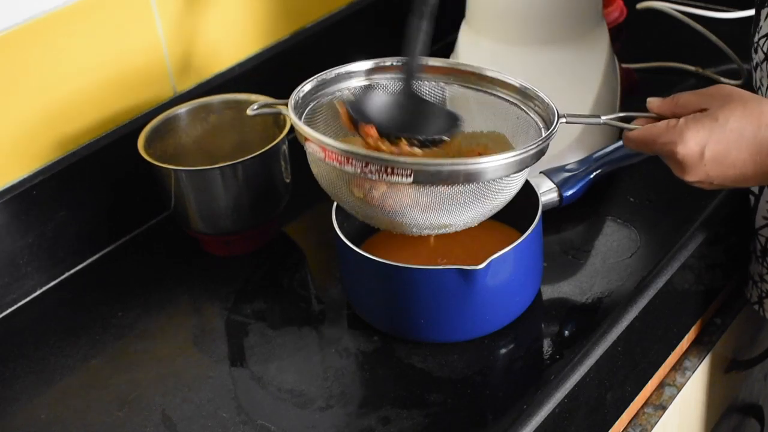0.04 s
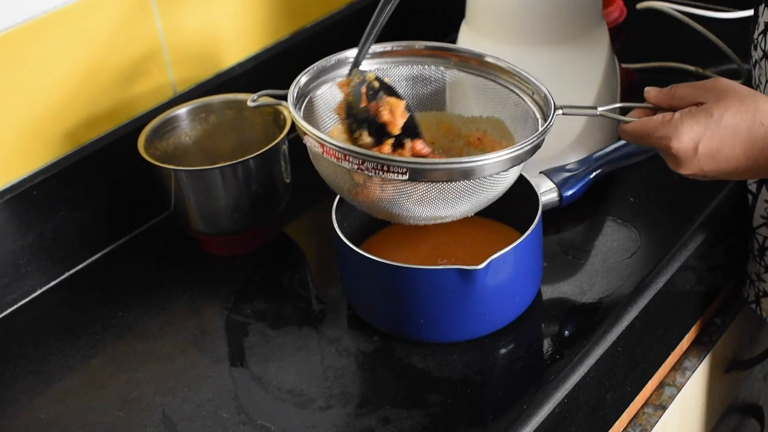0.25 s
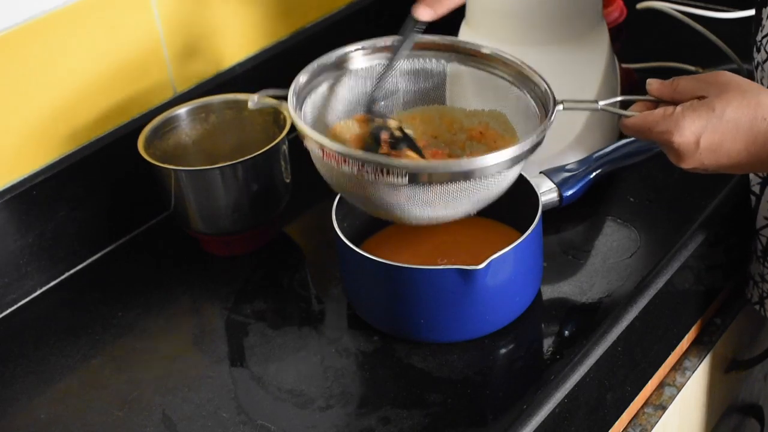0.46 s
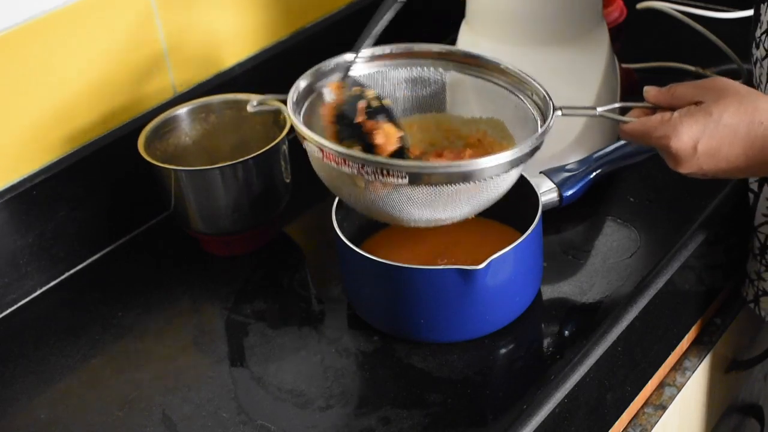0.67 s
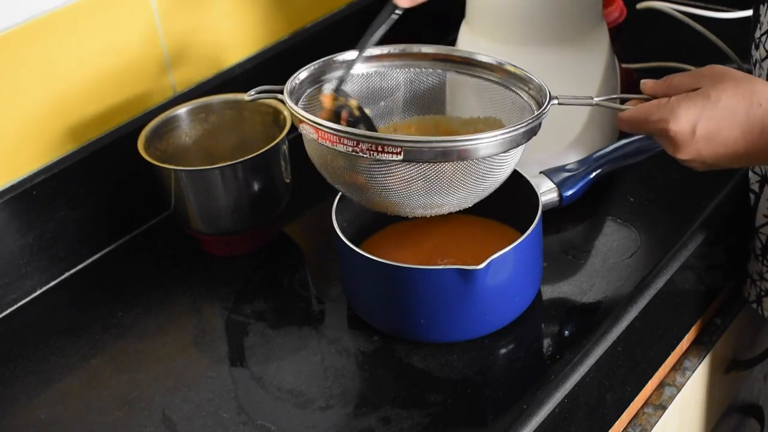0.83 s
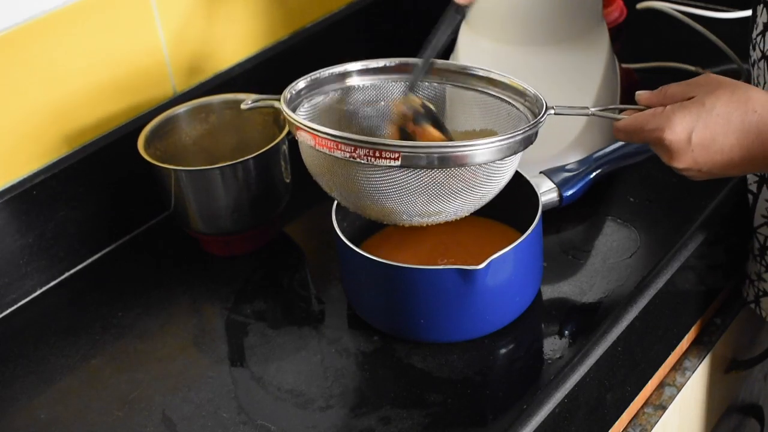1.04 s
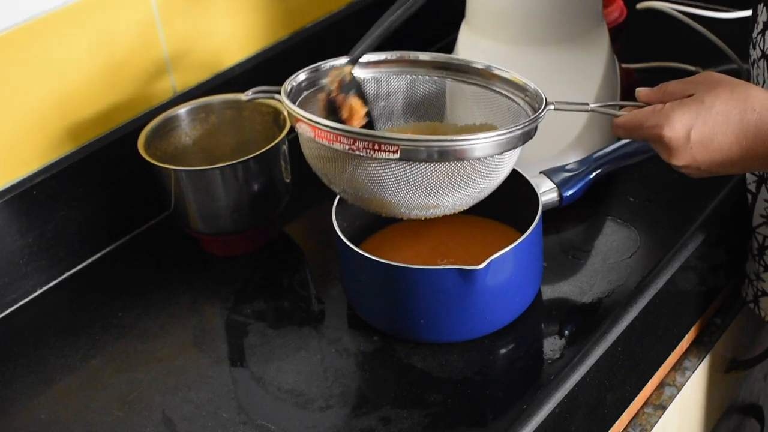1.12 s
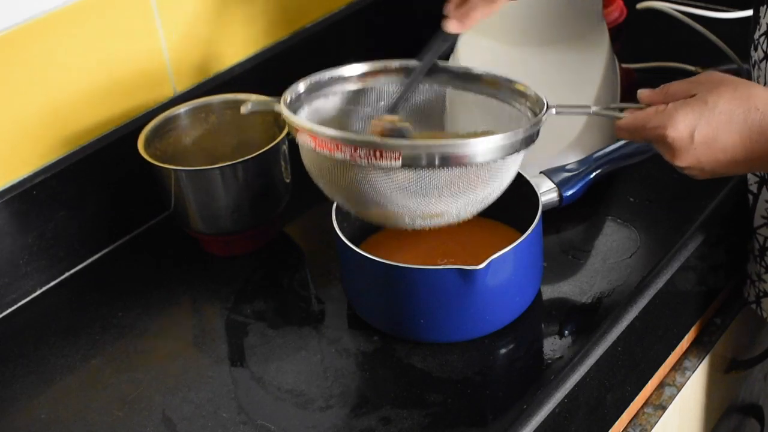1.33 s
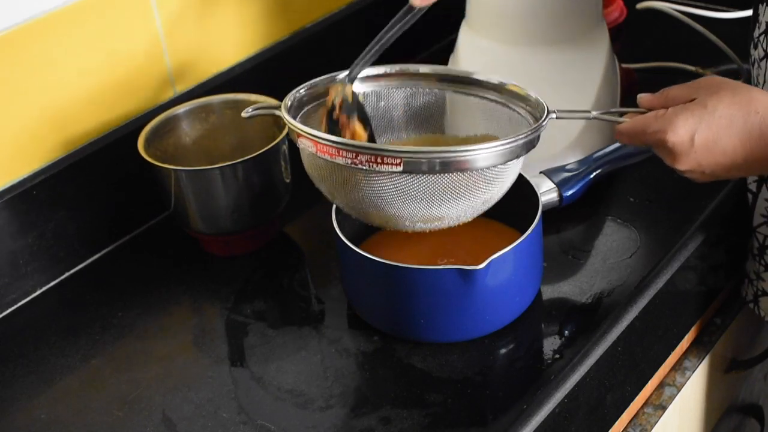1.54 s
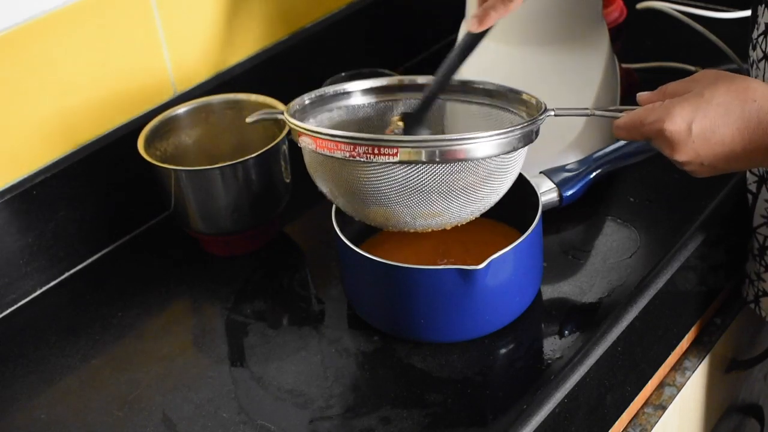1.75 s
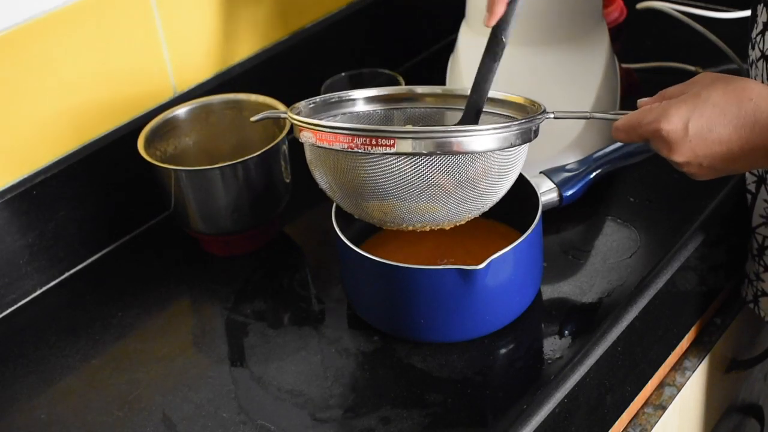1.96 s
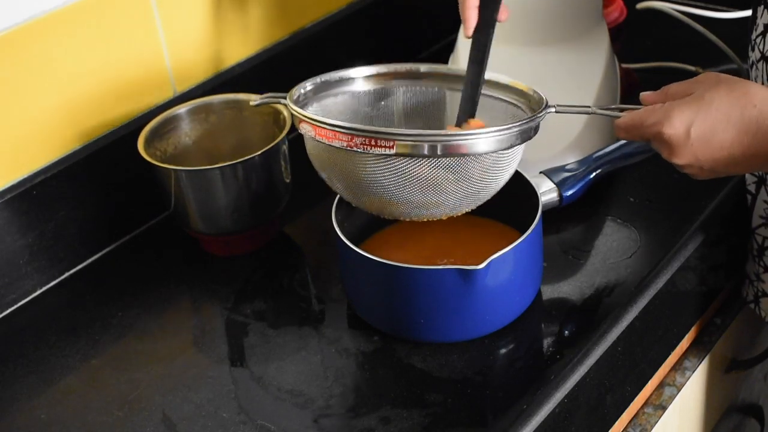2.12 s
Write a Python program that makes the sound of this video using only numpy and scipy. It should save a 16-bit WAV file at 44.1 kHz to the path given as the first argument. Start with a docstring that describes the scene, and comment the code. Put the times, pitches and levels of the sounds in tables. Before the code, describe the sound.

Short, raspy scrapes of a spatula against a metal strainer, with a few light taps.

```python
"""A small hard kitchen, where a plastic spatula pushes pulp through a steel mesh strainer in short strokes.
Its edge slips from wire to wire: this stick-slip force excites the modes of the bowl and rim, while
the flicked wires rasp and hiss. Now and then the spatula taps the steel, zips over a few wires or
plucks the mesh. Wet pulp ticks, and the strainer brushes a saucepan once, which rings faintly.
Behind it all lie room air, a soft midrange wash and the hum of an appliance."""
import sys
import numpy as np
from scipy import signal
from scipy.fft import rfft, irfft, next_fast_len
from scipy.io import wavfile
from scipy.ndimage import map_coordinates

SR = 44100
rng = np.random.default_rng(int(sys.argv[2]) if len(sys.argv) > 2 else 0)


def inscribe(sig):
    """Save sig as 16-bit PCM at rate SR to the path in sys.argv[1].

    A 1-D sig is mono; a 2-D sig holds one channel per row.
    Samples are clipped to [-1, 1] before scaling.
    """
    pcm = np.round(np.clip(np.atleast_2d(sig).T, -1, 1) * 32767)
    wavfile.write(sys.argv[1], SR, pcm.astype(np.int16))


N = 96402
TIME = np.arange(N) / SR


def amp(db):
    """Amplitude ratio of a level in decibels."""
    return 10 ** (np.asarray(db) / 20)

def unit(x):
    """Normalisation to an rms of 1."""
    return x / np.sqrt(np.mean(x ** 2) + 1e-20)

def along(points, hz):
    """Interpolation of (f/Hz, value) points on a logarithmic frequency axis."""
    f, v = np.transpose(points)
    return np.interp(np.log(hz + 1), np.log(f + 1), v)

def wobble(rate):
    """Random modulation: a spline through `rate` Gaussian values a second."""
    return map_coordinates(rng.standard_normal(N // 20), [np.arange(N) * rate / SR], mode="wrap")

def coloured(x, points, size=2048):
    """Minimum-phase filtering through (f/Hz, level/dB) points; white noise keeps its power."""
    cepstrum = irfft(np.log(amp(along(points, np.fft.rfftfreq(size, 1 / SR)))))
    cepstrum[1:size // 2] *= 2
    cepstrum[size // 2 + 1:] = 0
    response = irfft(np.exp(rfft(cepstrum)))
    return signal.fftconvolve(x, response / np.linalg.norm(response))[:N]

def push(start, length, attack, release):
    """Contact pressure: a linear rise, then exponential relaxation from `length` seconds after the start."""
    t = TIME - start
    return np.clip(t / attack, 0, 1) * np.exp(-np.maximum(t - length, 0) / release)

def damped_mode(start, db, hz, t60, waver=0):
    """Free vibration: a sinusoid swells briefly and decays exponentially; `waver` shifts its phase."""
    t = np.maximum(TIME - start, 0)
    swell = 1 - np.exp(-t * hz / 0.72)  # time constant of 0.72 cycles
    return 2 * amp(db - 60 * t / t60) * np.sin(2 * np.pi * hz * t + waver) * swell

def clicks(contacts, colour, t60):
    """Modal overlap: each contact excites resonances so dense that they decay as coloured noise."""
    rise_s = 0.0015  # the soft plastic cushions each contact
    envelope = sum(np.clip((TIME - s) / rise_s, 0, 1) * amp(db + 5 - 60 * np.maximum(TIME - s, 0) / t60)
                   for s, db in contacts)
    return coloured(envelope * rng.standard_normal(N), colour)


# Reverberation time of the kitchen: f/Hz, T60/s
ROOM_DECAY = [(200, 0.36), (1000, 0.35), (4000, 0.33), (9000, 0.21), (16000, 0.12)]

def kitchen(x, wet_db, wall_delay_s=0.004):
    """Reverberation: direct sound plus a diffuse tail whose treble is absorbed first."""
    hz, t, spectra = signal.stft(rng.standard_normal(SR // 2), SR, nperseg=256)
    decay = amp(-60 * t / along(ROOM_DECAY, hz)[:, None])
    tail = signal.istft(spectra * decay, SR, nperseg=256)[1]
    tail *= np.clip(np.arange(len(tail)) / SR / wall_delay_s - 1, 0, 1)
    diffuse = signal.fftconvolve(x, tail / np.linalg.norm(tail))[:N]
    return (x + amp(wet_db) * diffuse) / np.hypot(1, amp(wet_db))


# Spectrum of the room air: f/Hz, level/dB
AIR_SPECTRUM = [(25, -4), (60, -3.5), (100, -2), (150, -1), (280, 7.5), (600, 11), (2000, 2.5), (6000, -7),
                (15800, -6)]

def room_air():
    """Stationary broadband noise: the steady floor of the room."""
    return amp(-60) * coloured(rng.standard_normal(N), AIR_SPECTRUM)


# Partials of the appliance: f/Hz, level/dB
HUM_PARTIALS = [(100, -80.5), (203, -77), (269, -78.5), (399, -68.5)]

def appliance_hum():
    """Amplitude and phase modulation: each low partial wavers slightly."""
    return sum(np.sqrt(2) * amp(db + 1.5 * wobble(11.4))
               * np.sin(2 * np.pi * hz * TIME + 0.5 * wobble(5.78)) for hz, db in HUM_PARTIALS)


# Envelope of the wash: t/s, level/dB
WASH_ENVELOPE = [(0, -49), (.14, -53.5), (.3, -56), (.46, -54.5), (.78, -51), (.83, -55), (.96, -52),
                 (1.2, -52), (1.36, -56), (1.62, -55.5), (1.73, -50.5), (2.19, -51.5)]
# Its spectrum: f/Hz, level/dB
WASH_SPECTRUM = [(100, -44), (260, -3), (500, -4), (800, 3.5), (1050, 0.5), (1350, 5.5), (2000, 2.5),
                 (2800, -6), (5000, -10), (10000, -15), (15800, -27)]

def midrange_wash():
    """Amplitude-modulated noise: a soft wash that swells and sinks, heard between the strokes."""
    level_db = np.interp(TIME, *np.transpose(WASH_ENVELOPE)) + 0.13 * wobble(36.8)
    return amp(level_db) * coloured(rng.standard_normal(N), WASH_SPECTRUM)


# Modes of the saucepan: f/Hz, level/dB, T60/s
PAN_MODES = [(1404, -56, 0.55), (1920, -57, 0.24)]

def saucepan(touch_s=0.824):
    """Phase modulation: the brushing strainer rings the pan, and the rubbing unsettles that ring."""
    return sum(damped_mode(touch_s, db, hz, t60, waver=1.5 * wobble(91)) for hz, db, t60 in PAN_MODES)


# Ticks of the pulp: t/s, level/dB
PULP_TICKS = [(0.026, -49.5), (0.225, -59.5), (0.734, -62), (0.976, -62), (0.983, -54), (1.240, -63),
              (1.301, -58), (1.545, -48.5), (1.616, -62), (1.625, -64)]
# Spectrum shared by the ticks and the wire zips: f/Hz, level/dB
BRIGHT_SPECTRUM = [(100, -61), (500, 7), (2800, -6), (3900, 3.5), (6000, 0), (8500, 5.5), (10000, 5),
                   (13000, 4), (15800, -4.5)]

def pulp_ticks():
    """Broadband transients: the wet pulp gives faint, bright, quickly damped ticks."""
    return clicks(PULP_TICKS, BRIGHT_SPECTRUM, t60=0.064)


# Taps of the spatula on the steel: t/s, level/dB
SPATULA_TAPS = [(0.012, -51), (0.020, -59), (0.0355, -35.5), (0.051, -55), (0.761, -53), (0.823, -53),
                (1.0186, -41.5)]
# Spectrum of a tap: f/Hz, level/dB
TAP_SPECTRUM = [(50, -39), (150, -15), (250, -15), (600, -6.5), (1300, -8.5), (1900, -2.5), (2600, -7.5),
                (3550, -5.5), (4400, -6.5), (6500, -12), (12500, -10), (14000, -25)]
# Modes of the whole strainer: f/Hz, level/dB, T60/s
STRAINER_MODES = [(225, -63, .25), (266, -56, .3), (1850, -38, .03), (3550, -42, .018)]

def spatula_taps():
    """Impact excitation: every tap clicks, and the strongest sets the whole strainer ringing."""
    strongest_s = max(SPATULA_TAPS, key=lambda tap: tap[1])[0]
    ringing = sum(damped_mode(strongest_s, db, hz, t60) for hz, db, t60 in STRAINER_MODES)
    return clicks(SPATULA_TAPS, TAP_SPECTRUM, t60=0.047) + ringing


# Plucks of the mesh: t/s, level/dB, f/Hz, T60/s
MESH_PLUCKS = [(0.54, -40, 1606, 0.058), (0.634, -44.5, 862, 0.11), (0.758, -51, 4680, 0.039),
               (1.0202, -47.5, 4620, .04), (1.391, -48, 4030, .04), (1.53, -46.5, 6770, 0.024)]

def mesh_plucks():
    """Plucked vibration: a single mode rings freely as the edge catches or lets go."""
    return sum(damped_mode(*pluck) for pluck in MESH_PLUCKS)


def wire_flicks(per_s=8000, spread_db=7, chatter_db=1.26):
    """Shot noise: single wires give dense random impulses, in chattering clumps."""
    impulses = (rng.random(N) < per_s / SR) * np.sign(rng.standard_normal(N))
    level_db = spread_db * np.clip(rng.standard_normal(N), -2, 2) - chatter_db * wobble(400)
    return unit(impulses * amp(level_db))


# Runs of the edge over a few wires: t/s, duration/s, level/dB
WIRE_ZIPS = [(0.486, 0.0075, -45), (0.518, 0.004, -47), (0.620, 0.0032, -29), (1.393, 0.018, -33),
             (1.635, 0.0073, -44), (1.738, 0.11, -51.5), (1.828, 0.016, -42)]

def wire_zips():
    """Gated shot noise: the edge catches, then zips over the wires in a bright burst."""
    pressure = sum(amp(db) * push(s, length, attack=0.005, release=0.006) for s, length, db in WIRE_ZIPS)
    return coloured(pressure * wire_flicks(), BRIGHT_SPECTRUM)


def mesh_patches(flicks, low_hz=2548, high_hz=10680, t60=0.022, crossing_s=0.025, mix=0.36):
    """Local resonance: each patch of mesh that the edge crosses zings in its own short high modes."""
    t = np.arange(SR // 50) / SR
    hop = int(crossing_s * SR)
    zing = np.zeros(N + SR)
    for i in range(0, N, hop):
        place, phase = rng.random((2, 36, 1))  # 36 modes a patch
        hz = low_hz * (high_hz / low_hz) ** place
        response = np.sin(2 * np.pi * (hz * t + phase)).sum(0) * amp(-60 * t / t60)
        ringing = signal.fftconvolve(flicks[i:i + hop], response / np.linalg.norm(response))
        zing[i:i + len(ringing)] += ringing
    return np.sqrt(1 - mix) * flicks + np.sqrt(mix / 2) * zing[:N]

def stick_slip(start, length, rate, slowing_oct_per_s=5, scatter=0.22, spread_db=0.5):
    """Relaxation oscillation: an uneven train of force pulses, slowing as the push goes on."""
    gaps, sizes = rng.standard_normal((2, 400))
    from_middle = np.clip(TIME - start - length / 2, -length, length)
    slip_rate = rate * 2 ** (-slowing_oct_per_s * from_middle)
    wires_crossed = np.cumsum(slip_rate * (TIME >= start)) / SR
    slip_samples = np.searchsorted(wires_crossed, np.cumsum(np.exp(scatter * gaps)))
    return np.bincount(slip_samples, amp(spread_db * sizes), N)[:N]

def steel_response(force, modes, focus_hz, width_oct):
    """Modal superposition: the place of contact favours the modes near a focus frequency."""
    t = np.arange(SR // 8) / SR
    response = sum(rng.choice([-1, 1]) * amp(db - 60 * t / t60) * np.cos(2 * np.pi * hz * t)
                   / (1 + (np.log2(hz / focus_hz) / width_oct) ** 2) for hz, db, t60 in modes)
    radiation = signal.butter(2, [260, 3500], "bandpass", fs=SR, output="sos")  # open mesh: no bass
    return unit(signal.sosfilt(radiation, signal.oaconvolve(force, response)[:N]))


# Modes of the mesh bowl and of its rim: f/Hz, level/dB, T60/s
BOWL_MODES = [(285, 0, .07), (380, 0, .05), (470, -3, .045), (560, -7, .035), (640, -7, .04), (712, 2, .11),
              (810, -7, .035), (860, -1, .075), (915, -5, .04), (1002, -.5, .09), (1066, -2, .06),
              (1170, -1, .055)]
RIM_MODES = [(1310, -3, .025), (1423, -3, .045), (1470, -2, .04), (1595, -1, .05), (1689, 0, .06),
             (1750, -3, .04), (1812, 0, .055), (1910, -1, .045), (1985, -1, .045), (2110, -4, .03),
             (2218, -1, .045), (2352, -2, .045)]
# Spectra of the wires' rasp and hiss: f/Hz, level/dB
RASP_SPECTRUM = [(60, -96), (150, -79), (350, -11), (1200, 5), (2300, 0), (2850, 3.5), (3300, 2),
                 (4300, 1.5), (5400, 0), (7000, -7), (10000, -13), (16000, -24)]
HISS_SPECTRUM = [(2000, -49), (5500, -10), (7200, 0), (9500, 0.5), (10800, -3.5), (13000, -3.5),
                 (15800, -7.5)]
# Pushes of the spatula: t/s, attack/s, duration/s, mid-stroke slip rate/Hz, bowl level/dB, bowl focus/Hz,
# rim level/dB, rim focus/Hz, rim focus half-width/octaves, rasp level/dB, hiss level/dB
SPATULA_STROKES = [ (0.528, 0.014, 0.0268, 690, -35.5, 670, -38.5, 1650, .27, -45.5, -44.5),
                   (0.562, 0.014, 0.029, 530, -42.5, 640, -54, 1650, .25, -46, -63),
                   (0.579, 0.012, 0.051, 400, -42.5, 680, -36, 1730, 0.36, -34.5, -35.5),
                   (1.017, 0.022, 0.043, 527, -45, 600, -42, 1700, .18, -49.5, -49),
                   (1.063, 0.0064, 0.0424, 628, -40, 850, -34.5, 1850, 0.31, -36.5, -43),
                   (1.397, 0.015, 0.048, 900, -37, 990, -36.5, 1710, 0.16, -37.5, -37.5),
                   (1.439, 0.025, 0.04, 368, -35.5, 820, -39.5, 1700, .25, -34, -47),
                   (1.503, 0.009, 0.024, 1030, -58, 776, -56, 1600, 0.33, -56, -55.5),
                   (1.751, 0.045, 0.076, 823, -33, 1070, -33.5, 1550, .36, -36.5, -40.5),
                   (1.843, 0.03, 0.095, 480, -43.5, 670, -39, 1970, 1, -43.5, -46),
                   (1.947, 0.01, 0.061, 330, -47.5, 715, -48, 1680, 0.36, -45.5, -50.5),
                   (2.01, 0.0082, 0.06, 311, -41.5, 760, -39.5, 2150, 0.23, -43, -41.5),
                   (2.078, 0.0089, 0.032, 430, -55, 795, -42, 2060, 0.12, -52, -53.5),
                   (2.116, 0.0079, 0.048, 235, -50.5, 690, -60, 1980, 0.16, -55, -55.5)]

def scraping(release_s=0.014, wire_lag_s=0.0028):
    """Frictional excitation: each push drives bowl and rim by slips, and the wires rasp and hiss."""
    body, rasp_envelope, hiss_envelope = np.zeros((3, N))
    for (start, attack, length, rate, bowl_db, bowl_hz,
         rim_db, rim_hz, rim_oct, rasp_db, hiss_db) in SPATULA_STROKES:
        pressure = push(start, length, attack, release_s)
        force = pressure * stick_slip(start, length, rate)
        bowl = amp(bowl_db) * steel_response(force, BOWL_MODES, bowl_hz, width_oct=0.69)
        rim = amp(rim_db) * steel_response(force, RIM_MODES, rim_hz, rim_oct)
        body += np.sqrt(np.mean(pressure ** 2)) * (bowl + rim)
        bite = push(start, length, attack + wire_lag_s, release_s)  # wires speak later than the bowl
        rasp_envelope += amp(rasp_db) * bite
        hiss_envelope += amp(hiss_db) * bite
    rasp = coloured(mesh_patches(rasp_envelope * wire_flicks()), RASP_SPECTRUM)
    hiss = coloured(mesh_patches(hiss_envelope * wire_flicks()), HISS_SPECTRUM)
    return kitchen(body, wet_db=-8) + kitchen(rasp, wet_db=-7.5) + kitchen(hiss, wet_db=-4)


def scene():
    """Superposition: the reverberant contacts and the background add in one channel."""
    steel = spatula_taps() + mesh_plucks() + saucepan()
    bright = wire_zips() + pulp_ticks()
    contacts = kitchen(bright, wet_db=-4) + kitchen(steel, wet_db=-8) + scraping()
    return (contacts + midrange_wash() + appliance_hum() + room_air())[None]


# Treble roll-off: f/Hz, level/dB
TREBLE_ROLL_OFF = [(100, 0), (13000, 0), (14500, -2.5), (15800, -7)]

def record(dry, top_hz=15900):
    """Band limiting: the top octave is softened and nothing above the limit passes."""
    size = next_fast_len(N + SR // 2)
    hz = np.fft.rfftfreq(size, 1 / SR)
    gain = amp(along(TREBLE_ROLL_OFF, hz)) * (hz < top_hz)
    return irfft(rfft(dry, size) * gain, size)[..., :N]


dry = scene()
out = record(dry)
inscribe(out)
```